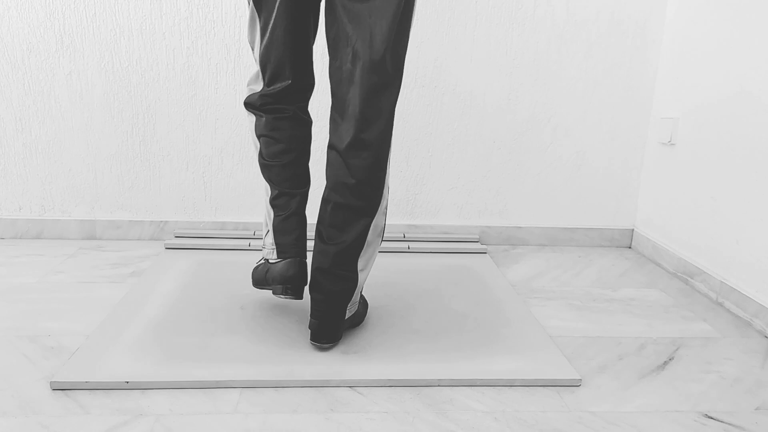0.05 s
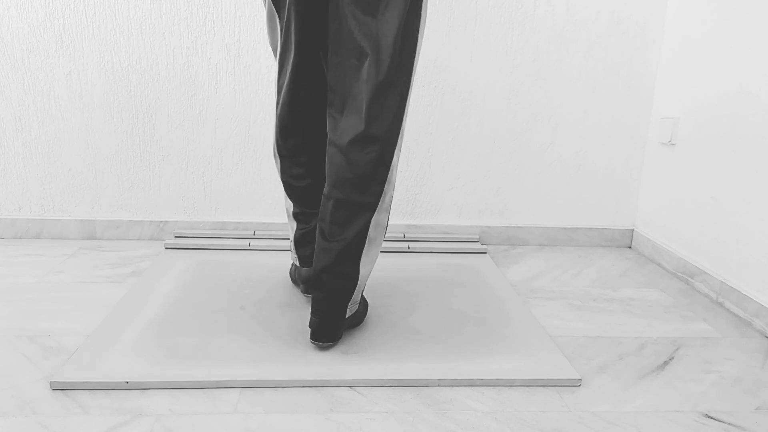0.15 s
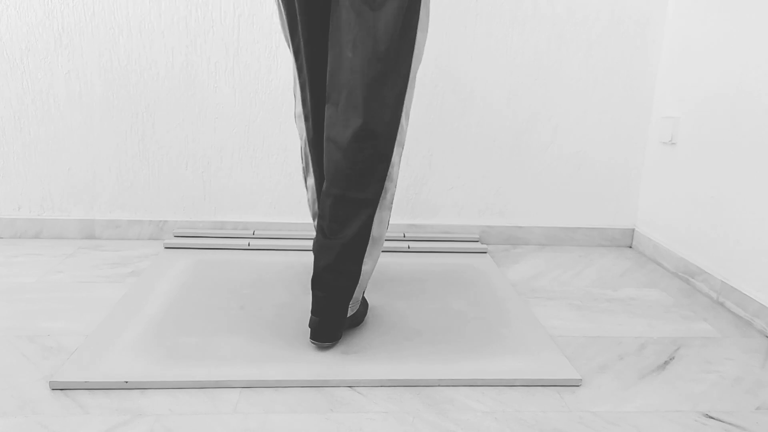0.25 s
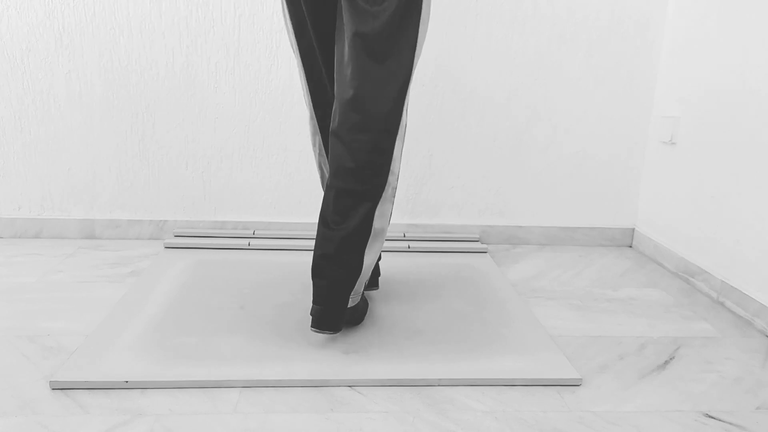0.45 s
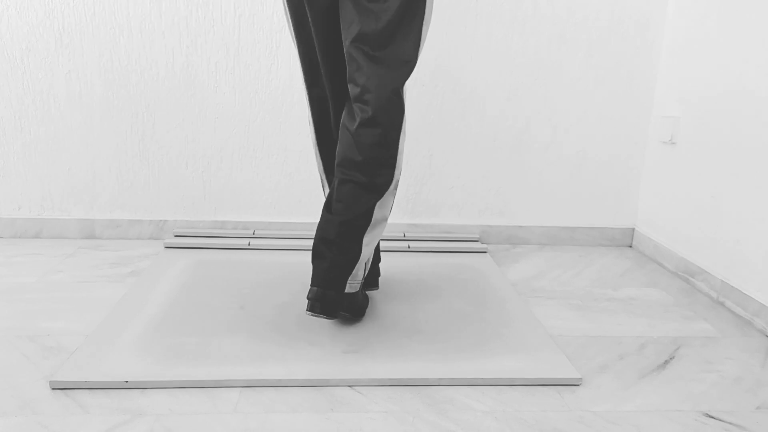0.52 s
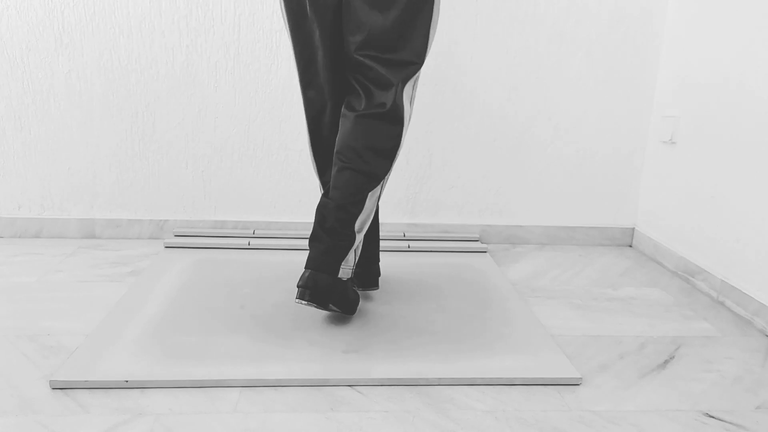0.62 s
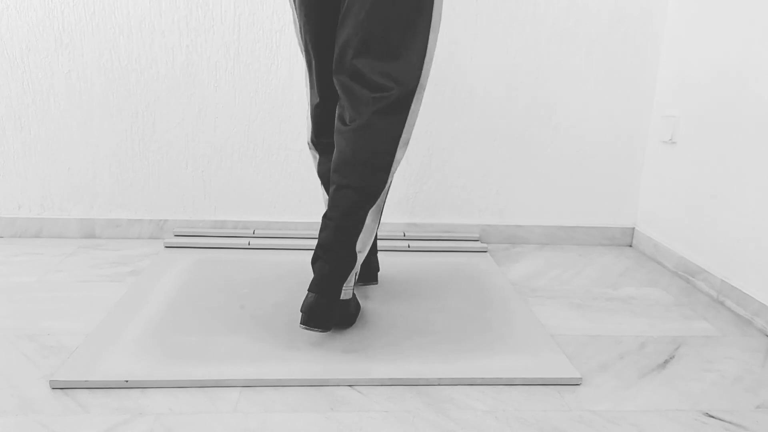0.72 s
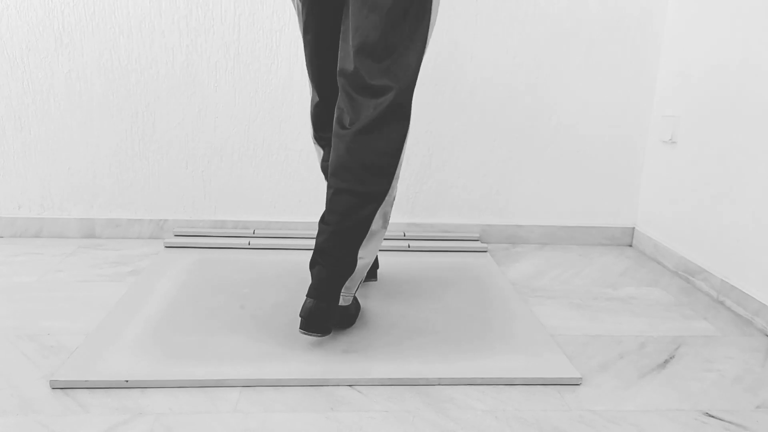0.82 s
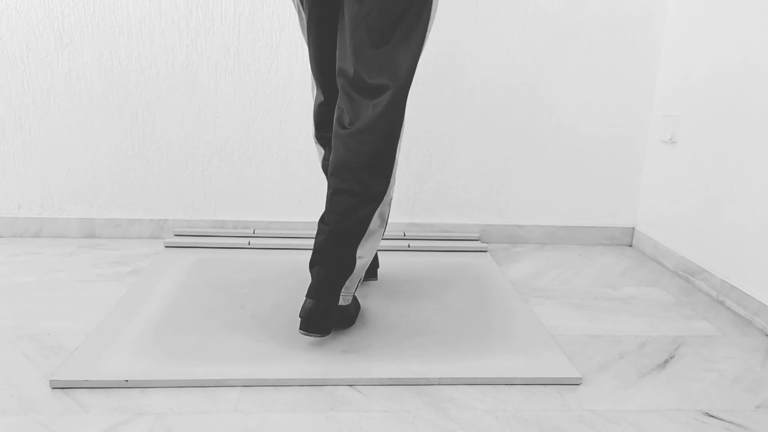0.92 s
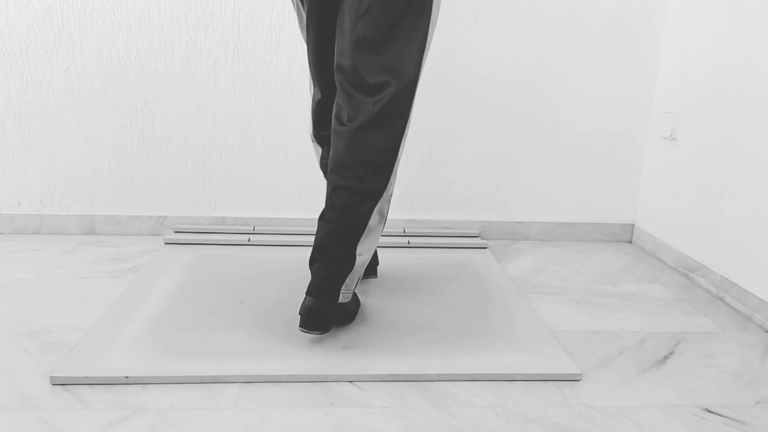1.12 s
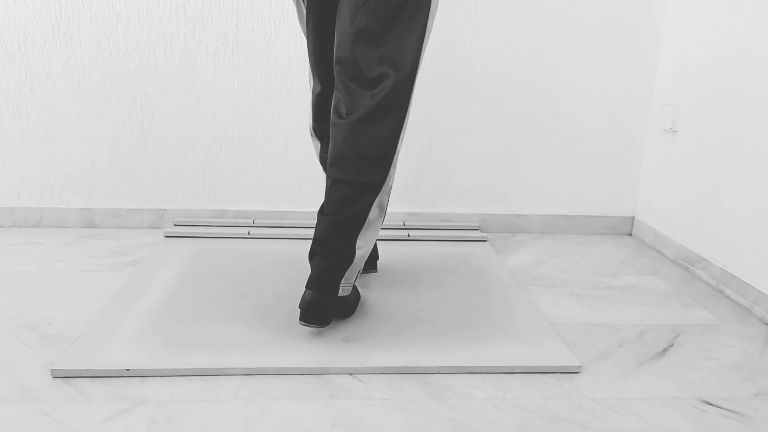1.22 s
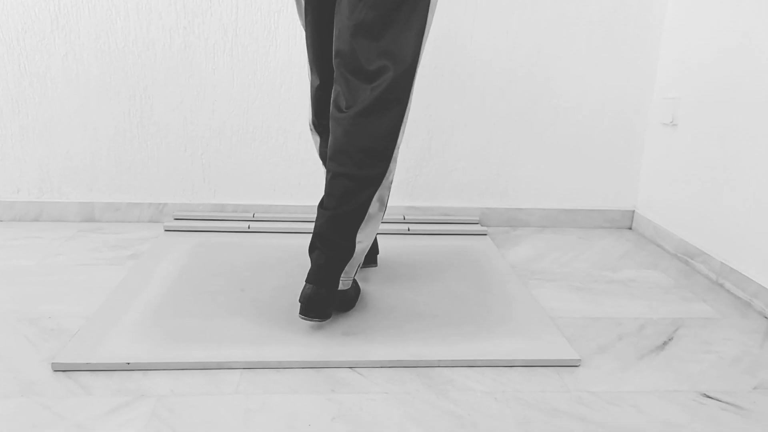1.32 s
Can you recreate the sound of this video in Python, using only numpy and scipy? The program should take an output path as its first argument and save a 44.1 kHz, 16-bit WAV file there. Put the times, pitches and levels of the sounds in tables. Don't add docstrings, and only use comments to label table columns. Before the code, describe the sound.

Tap shoes strike a wooden board three times, toe, heel and a loud stamp, in a bare room

```python
import sys
import numpy as np
from scipy import signal
from scipy.fft import rfft, irfft, next_fast_len
from scipy.io import wavfile
from scipy.ndimage import uniform_filter1d, minimum_filter1d

SR = 44100
rng = np.random.default_rng(int(sys.argv[2]) if len(sys.argv) > 2 else 0)


def store_wav(level_fs):
    pcm = np.round(np.clip(np.atleast_2d(level_fs), -1, 1) * 32767)
    wavfile.write(sys.argv[1], SR, pcm.T.astype(np.int16))


def gain_from_db(level_db):
    decades = np.asarray(level_db, float) / 20
    return 10 ** decades


N = 59535
LEFT_RIGHT = np.array([[1], [-1]])

# (frequency [Hz], level [dB], t60 [s])
HEEL_PLATE = [(1842, -14.5, 0.055), (5150, -12.5, .01), (9200, -21.5, .012)]


def unit(x):
    return x / np.sqrt(np.mean(x ** 2) + 1e-20)


def along(points, hz):
    f, v = np.transpose(points)
    return np.interp(np.log(hz + 1), np.log(f + 1), v)


def filtered(x, response):
    size = next_fast_len(x.shape[-1] + 8192)
    spectrum = rfft(x, size) * response(np.fft.rfftfreq(size, 1 / SR))
    return irfft(spectrum, size)[..., :x.shape[-1]]


def causal(colour, size=2048):
    level = gain_from_db(along(colour, np.fft.rfftfreq(size, 1 / SR)))
    cepstrum = irfft(np.log(level + 1e-6), size)
    cepstrum = cepstrum * np.r_[1, np.full(size // 2 - 1, 2), 1, np.zeros(size // 2 - 1)]
    click = irfft(np.exp(rfft(cepstrum)), size)
    return click / np.linalg.norm(click)


def paired(noise, alike):
    def turn(hz):
        return np.arccos(np.clip(along(alike, hz), -1, 1)) / 2

    mid, side = filtered(noise, lambda hz: np.array([np.cos(turn(hz)), np.sin(turn(hz))]))
    return np.array([mid + side, mid - side])


def hush(colour, alike):
    noise = paired(rng.standard_normal((2, N)), alike)
    return unit(filtered(noise, lambda hz: gain_from_db(along(colour, hz))))


def room():
    # (frequency [Hz], likeness [-1..1])
    echo_alike = [(60, .85), (130, .92), (290, .94), (640, .86), (1410, .25), (3100, .24), (6800, 0)]
    # (frequency [Hz], t60 [s])
    decay = [(100, 0.84), (300, 0.34), (700, 0.45), (1400, 0.36), (2100, 0.4), (4000, 0.31), (6500, 0.26),
             (14000, 0.16)]
    late_db, late_times, build_s = -19.5, 2.375, .004
    hz, t, z = signal.stft(paired(rng.standard_normal((2, SR)), echo_alike), SR, nperseg=256)
    fall_db = -60 * t / along(decay, hz)[:, None]
    fall = gain_from_db(fall_db) + gain_from_db(late_db + fall_db / late_times)
    tail = signal.istft(z * fall, SR, nperseg=256)[1][:, :SR]
    tail = tail * (1 - np.exp(-np.arange(SR) / SR / build_s))
    return tail / np.sqrt(np.sum(tail ** 2) / 2)


def crack(blow):
    t60_s, rise_s, spread, crack_db = .015, .0002, 0.74, 18.5
    t = np.arange(600) / SR
    burst = rng.standard_normal((2, 600)) * gain_from_db(-60 * t / t60_s) * (1 - np.exp(-t / rise_s))
    burst = burst[:1] + spread * burst[1] * LEFT_RIGHT
    return gain_from_db(crack_db) * signal.fftconvolve(burst / np.linalg.norm(burst), blow[None])


def plate_ring(plate, t):
    return sum(gain_from_db(level + 9.5 + rng.normal() - 60 * t / t60) * np.sin(2 * np.pi * hz * t)
               * (1 - np.exp(-t * hz / 2.6)) for hz, level, t60 in plate)


def shoe(contacts, tone, plate):
    lag_s = 0.000074
    lead = SR // 4
    t = np.arange(int(.8 * SR)) / SR
    near, far = np.zeros((2, 2, N + lead + 2 * SR))
    blow = causal(tone)
    for s, db, pan_db in contacts:
        hit = crack(blow)
        ring = plate_ring(plate, t)
        sent = gain_from_db(-18) * ring + gain_from_db(10) * np.pad(blow, (0, len(t) - len(blow)))
        echo = signal.fftconvolve(sent[None], room())
        i, gain = round(s * SR) + lead, gain_from_db(db + pan_db / 2 * LEFT_RIGHT)
        near[:, i:i + hit.shape[1]] += gain * hit
        near[:, i:i + len(t)] += gain * ring
        far[:, i:i + echo.shape[1]] += gain_from_db(db) * echo
    near = filtered(near, lambda hz: np.exp(-1j * np.pi * hz * lag_s * LEFT_RIGHT))
    return (near + far)[:, lead:lead + N]


def earlier_step():
    # (time [s], peak level [dB], left minus right [dB])
    contacts = [
        (-.098, -9, 55),
        (-.09, -6.5, 0),
    ]
    # (frequency [Hz], density [dB per Hz])
    tone = [(60, -28.5), (200, -13.5), (500, -12), (1600, -2.5), (3000, 0.5), (4800, -12.5), (6300, -4.5),
            (16000, -26.5)]
    return shoe(contacts, tone, HEEL_PLATE)


def room_floor():
    # (frequency [Hz], density [dB per Hz])
    colour = [(20, -2), (120, -14), (255, -13), (700, -25), (1760, -26), (6000, -33.5), (9500, -37.5),
              (11000, -46)]
    # (frequency [Hz], likeness [-1..1])
    floor_alike = [(60, 0.52), (240, 0.62), (950, 0.27), (3770, -0.09), (15000, -0.05)]
    return gain_from_db(-60) * hush(colour, floor_alike)


def board(blow_s, modes):
    board_db, unsteady_db, unsteady_s = 6, 4, .02
    t = np.maximum(np.arange(N) / SR - blow_s, 0)
    span = int(unsteady_s * SR)
    drift = uniform_filter1d(rng.standard_normal((len(modes), N)), span)
    drift = unit(uniform_filter1d(drift, span))
    wood = np.zeros(N)
    for (hz, db, t60, swell), wander in zip(modes, drift):
        level = gain_from_db(db + board_db + unsteady_db * wander - 60 * t / t60)
        wood += level * (1 - np.exp(-t / swell)) * np.sin(2 * np.pi * hz * t)
    return wood


def toe_step():
    # (time [s], peak level [dB], left minus right [dB])
    contacts = [
        (.1615, -22, 0),
        (.1636, 0, -1),
        (.1672, -4, -2),
        (.1692, -1, 4),
        (.175, -1, -1),
        (.1795, -5, 2),
    ]
    # (frequency [Hz], density [dB per Hz])
    tone = [(60, -48.5), (150, -19), (930, -8), (2400, -2), (4900, -13), (6200, -10), (9800, -14),
            (16000, -40)]
    # (frequency [Hz], level [dB], t60 [s])
    plate = [(2145, 0.5, 0.0083), (2630, -20, 0.023), (6050, -10, 0.013), (9200, -23.5, 0.013)]
    # (frequency [Hz], level [dB], t60 [s], swell [s])
    wood = [(79.6, -40.5, 0.35, 0.014), (190, -37, 0.2, 0.057), (490, -17, 0.024, 0.001),
            (932, -17, 0.11, 0.022), (1367, -28.5, 0.18, 0.013)]
    return gain_from_db(-12) * (shoe(contacts, tone, plate) + board(contacts[1][0], wood))


def heel_step():
    # (time [s], peak level [dB], left minus right [dB])
    contacts = [
        (.4223, -9, 0),
        (.4253, 0, -2),
        (.4288, -6, 4),
        (.4333, 0, -1),
        (.4395, -7, 0),
    ]
    # (frequency [Hz], density [dB per Hz])
    tone = [(59, -11.5), (100, -18.5), (249, -7.5), (1030, -6), (1520, -2), (5300, -9.5), (6150, -13),
            (9210, -6.5), (16000, -43.5)]
    # (frequency [Hz], level [dB], t60 [s], swell [s])
    wood = [(77, -30, 0.21, 0.025), (191, -37, .6, 0.0066), (257, -18, 0.15, 0.033), (577, -19, .1, .01),
            (1145, -22.5, 0.12, .01)]
    return gain_from_db(-13.5) * (shoe(contacts, tone, HEEL_PLATE) + board(contacts[1][0], wood))


def stamp_step():
    # (time [s], peak level [dB], left minus right [dB])
    contacts = [
        (.683, -20, 0),
        (.6849, 0, 0),
        (.688, -6, 2),
        (.6915, -11, 0),
        (.6965, -11, -2),
        (.7, -11, 0),
        (.7115, -14, 0),
    ]
    # (frequency [Hz], density [dB per Hz])
    tone = [(59, -35), (100, -20.5), (266, -8.5), (442, -9.5), (950, -2), (2000, 0), (4020, -6.5),
            (9210, -14.5), (16000, -38.5)]
    # (frequency [Hz], level [dB], t60 [s])
    plate = [(1957, -23.5, 0.074), (2400, -9.5, .022), (2960, -19, 0.045), (9800, -16.5, 0.0033)]
    # (frequency [Hz], level [dB], t60 [s], swell [s])
    wood = [(70, -39.5, 0.28, .03), (178, -34, 0.13, 0.032), (253, -42, 0.2, .01),
            (494, -38.5, 0.056, .003), (650, -46, 0.86, 0.064), (674, -41.5, 0.77, .07),
            (709, -38.5, .5, 0.013), (976, -12.5, 0.053, 0.005), (2195, -25, 0.36, .02)]
    return gain_from_db(-7) * (shoe(contacts, tone, plate) + board(contacts[1][0], wood))


def cloth():
    # (time [s], level [dB])
    strokes = [
        (1.1, -79.5),
        (1.12, -66),
        (1.158, -71),
        (1.186, -64),
        (1.272, -62),
        (1.34, -64.5),
        (1.35, -81),
    ]
    # (frequency [Hz], density [dB per Hz])
    colour = [(1500, -42.5), (2600, -9), (3300, 1.5), (4200, -5.5), (5200, -11.5), (6500, -30), (9000, -16),
              (11000, -44)]
    squeak_s, squeak_hz, squeak_db, squeak_len_s = 1.196, 4680, -63, .009
    t = np.arange(N) / SR
    s, db = np.transpose(strokes)
    grain = gain_from_db(2 * unit(uniform_filter1d(rng.standard_normal(N), 150)))
    swish = gain_from_db(np.interp(t, s, db, left=-120)) * unit(grain * hush(colour, [(1000, 0.84)]))
    squeak_shape = np.exp(-((t - squeak_s) / squeak_len_s) ** 4)
    squeak = gain_from_db(squeak_db) * squeak_shape * np.sin(2 * np.pi * squeak_hz * t)
    return swish + squeak


def microphones(steps):
    # (frequency [Hz], gain [dB])
    ports = [(30, -5), (120, 2.5), (200, 5), (6500, 7), (9300, 11.5), (10600, 12), (11200, 7),
             (15500, 11.5)]
    # (frequency [Hz], left minus right [dB])
    lean = [(60, 5.5), (250, 5), (700, 2), (1500, 5), (3000, -3.9), (6000, 1.5), (9000, -4.5), (13000, 4.5)]
    return filtered(steps, lambda hz: gain_from_db(along(ports, hz) + along(lean, hz) / 2 * LEFT_RIGHT))


def scene():
    steps = earlier_step() + toe_step() + heel_step() + stamp_step()
    return microphones(steps) + room_floor() + cloth()


def roll_off(x):
    return signal.sosfilt(signal.butter(12, 16310, fs=SR, output="sos"), x)


def record(dry):
    ceiling, look_ahead_s, recover_s = .93, .005, .003
    need = np.minimum(1, ceiling / (np.abs(dry).max(0) + 1e-9))
    ahead, span = int(look_ahead_s * SR) + 1, int(recover_s * SR) + 1
    gain = uniform_filter1d(minimum_filter1d(need, 2 * ahead + span), span)
    return roll_off(dry * gain)


dry = scene()
out = record(dry)
store_wav(out)
```